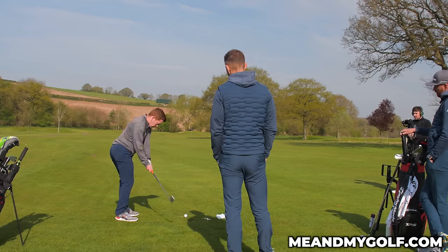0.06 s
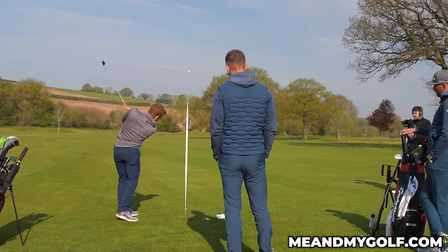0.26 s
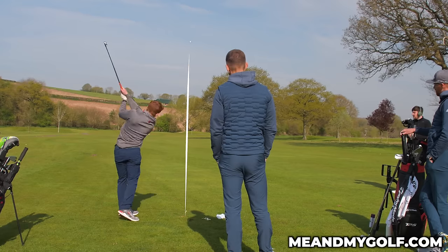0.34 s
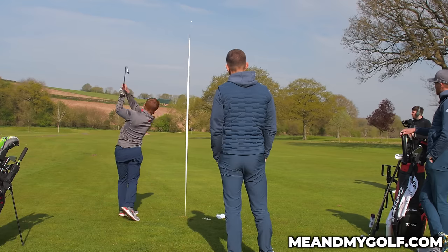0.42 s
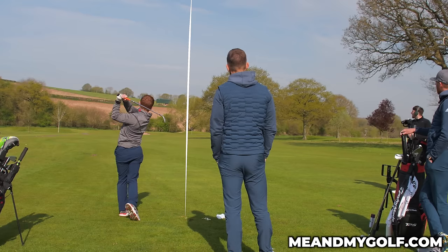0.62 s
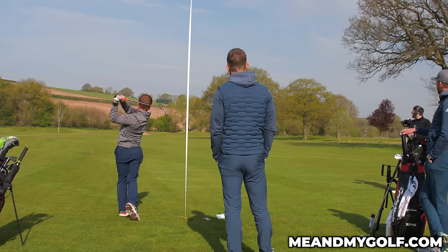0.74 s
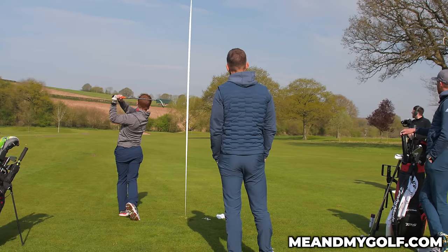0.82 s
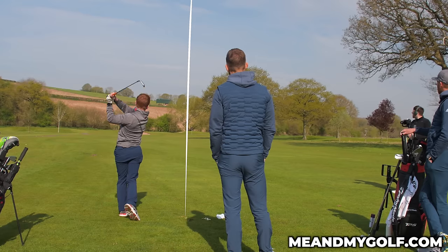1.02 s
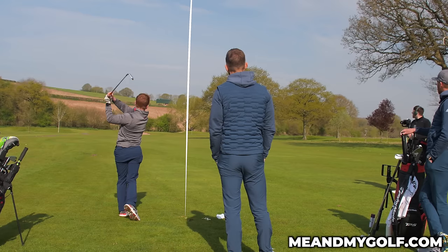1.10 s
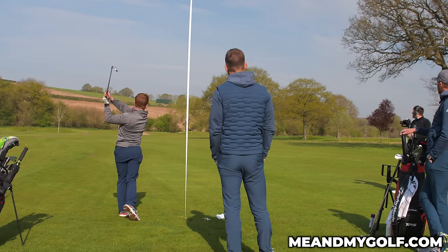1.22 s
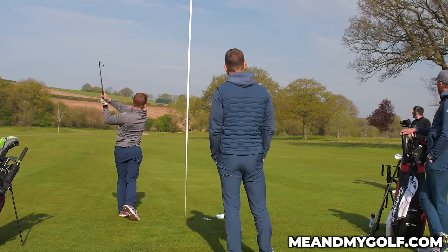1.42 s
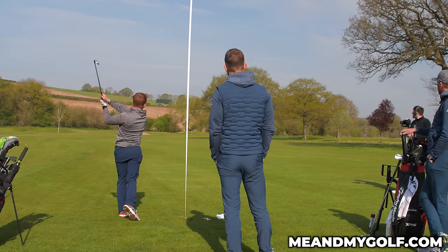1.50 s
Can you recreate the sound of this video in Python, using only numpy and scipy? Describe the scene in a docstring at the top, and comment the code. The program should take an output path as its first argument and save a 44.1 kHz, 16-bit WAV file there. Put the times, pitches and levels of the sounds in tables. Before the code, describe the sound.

An iron hits a golf ball with one sharp click and a brief cut of turf, just after a faint swish. Soil patters down and clothes rustle softly, while light wind rumbles on a nearby microphone on an open course.

```python
"""An iron strikes a golf ball on an open course, heard on one microphone close to the player.
The face cracks against the ball and rings briefly, and the blade cuts the turf. Just before, the shaft
sheds vortices and whistles up to speed. Soil patters down, small ticks and soft bumps follow, clothes
rustle through the follow-through, and moving air rumbles on the microphone."""
import sys
import numpy as np
from scipy.fft import rfft, irfft, next_fast_len
from scipy.io import wavfile
from scipy.ndimage import map_coordinates

SR = 44100
rng = np.random.default_rng(int(sys.argv[2]) if len(sys.argv) > 2 else 0)


def to_wav(sig):
    """Store sig (one row per channel, or 1-D mono) as 16-bit WAV at the path in sys.argv[1].

    Samples outside -1..1 are clipped; the rate is SR.
    """
    pcm = np.clip(np.atleast_2d(sig), -1, 1) * 32767
    pcm = np.round(pcm).astype(np.int16)
    wavfile.write(sys.argv[1], SR, pcm.T)  # frames by channels


N = 68355

# The dry snap of ticks and falling soil. Each row: frequency in Hz, gain in dB.
SNAP_COLOUR = [(200, -3), (700, 1), (2400, -1.5), (5000, 0), (7000, -3.5), (11000, -1.5), (13500, -8.5),
               (16000, -37)]
# The bright hiss of fabric and air. Each row: frequency in Hz, gain in dB.
HISS_COLOUR = [(500, -21.5), (2000, 2), (4000, 1.5), (7000, 0), (10000, 1.5), (13000, 2.5), (14200, -8.5),
               (15500, -28)]


def strike(ring_start_s=.2466, ping_hz=4202, ping_t60=.0105, ping_attack_s=.000398):
    """The clicks of the strike, then two quick echoes; each feeds the bright ping of ball and face."""
    # The last two are the fainter echoes. Each row: start in seconds, click and ping levels in dB.
    clicks = [(0.2464, -5.5, -31.5), (.24728, -1.5, -21.5), (0.2493, -4, -12), (0.2501, -5, -9.5),
              (0.2548, -10.5, -18.5), (.25864, -17, -22.5)]
    # The colour of a click. Each row: frequency in Hz, gain in dB.
    click_colour = [(60, -13.5), (300, 1), (650, 4.5), (1000, -4), (1600, 3), (2400, -4), (3400, 1),
                    (4500, -3), (5250, -15), (6100, -5), (9000, -10), (11500, -8), (14000, -18),
                    (16000, -28)]
    # Faint, short tones that colour the hit and ring on just after it.
    # Each row: frequency in Hz, level in dB, t60 in seconds.
    strike_tones = [(323, -26.5, 0.065), (465, -31.5, .06), (852, -34.5, .05), (1062, -33.5, .05),
                    (1280, -30, .05), (1641, -30.5, .045), (1934, -24, .05), (2317, -35, 0.052),
                    (2613, -33.5, .045), (2868, -25.5, 0.05), (3539, -24.5, 0.045), (4010, -29, .035),
                    (5685, -38.5, 0.063), (6100, -35.5, .045), (11870, -37, .04)]
    pulses, ping_envelope = np.zeros(N), np.zeros(N)
    for start, click_db, ping_db in clicks:
        pulses[round(start * SR)] += amp(click_db)
        t = since(start)
        ping_envelope += amp(ping_db) * rise(t, ping_attack_s) * fade(t, ping_t60)
    t = since(ring_start_s)
    ping = ping_envelope * np.sin(2 * np.pi * ping_hz * t)
    tones = sum(amp(db) * ring(t, hz, t60, attack=.0018) for hz, db, t60 in strike_tones)
    return causal_filter(pulses, click_colour) + ping + tones


def turf():
    """The blade brushes the grass, then tears the turf in short bursts over one low ground thump."""
    # The bursts. Each row: start in seconds, level in dB, then attack, hold and t60 in seconds.
    cuts = [(0.2413, -44, .002, .003, .01), (0.2459, -18, 0.0013, .003, .03),
            (0.257, -29, .001, .004, .032), (0.277, -49.5, .002, .003, 0.062)]
    # The colour of tearing turf. Each row: frequency in Hz, gain in dB.
    turf_colour = [(60, -8.5), (300, 2), (700, 6.5), (1500, 0), (2600, -0.5), (4000, 4.5), (5250, -15),
                   (6100, -7), (9000, -11), (11500, -8), (14000, -16), (16000, -30.5)]
    tearing = np.zeros(N)
    for start, db, attack, hold, t60 in cuts:
        onset = np.minimum(since(start) / attack, 1)
        tearing += amp(db) * onset * fade(since(start + hold), t60)
    thump = amp(-23.5) * ring(since(.2492), hz=62, t60=.067, attack=.0008)
    return tearing * noise(turf_colour) + thump


def swish(pitch_waver=.03, rush_peak_s=.21, rush_db=-49.5, rise_s=.027, fall_s=.055):
    """Vortices shed by the shaft whistle at a pitch that follows its speed, in a rush of air."""
    # The whistle along the swing. Each row: time in seconds, pitch in Hz, level in dB.
    swing = [(.11, 301.7, -91), (.155, 372.7, -81), (.178, 400.4, -46), (.19, 451.5, -54),
             (.205, 503.7, -38.5), (.218, 522.6, -50.5), (.238, 554.6, -33), (.246, 535, -43.5),
             (.285, 416, -50.5), (.305, 382, -63.5)]
    # The colour of the rush. Each row: frequency in Hz, gain in dB.
    rush_colour = [(100, -15), (350, 2), (800, 5), (1400, -12), (2800, -7.5), (5000, -23.5), (12000, -25),
                   (16000, -34.5)]
    hz, db = curves(swing)
    phase = 2 * np.pi * np.cumsum(hz * (1 + pitch_waver * wobble(110))) / SR
    release = fade(since(swing[-1][0]), t60=.12)
    whistle = unit(np.sin(phase)) * amp(db + 1.2 * wobble(110)) * release
    t = clock() - rush_peak_s
    swell = np.exp(-.5 * (t / np.where(t < 0, rise_s, fall_s)) ** 2)
    return whistle + amp(rush_db) * swell * noise(rush_colour)


def ticks(knock_t60=.004, snap_t60=.0033, attack_s=.00017):
    """Small dry ticks, as of grit and clothing: each a dead knock of two modes with a snap of noise."""
    # Each row: start in seconds, low mode in Hz and dB, high mode in Hz and dB, snap level in dB.
    knocks = [(0.0192, 3680, -57, 10750, -38.5, -52.5), (0.301, 4140, -41, 6200, -44, -50),
              (0.3261, 2530, -33, 4800, -32, -39.5), (0.3485, 2880, -41, 4400, -47, -49),
              (.357, 1910, -45, 12500, -46, -42.5), (0.4015, 2550, -32, 4250, -35.5, -42.5),
              (0.4806, 2680, -28.5, 4900, -34.5, -39), (0.6816, 1500, -47, 6500, -50, -43),
              (.868, 904, -48, 3530, -53, -53.5), (1.222, 1900, -60, 4030, -61, -57),
              (1.435, 4484, -66, 6500, -60, -64), (1.461, 5000, -58, 11000, -54, -56)]
    snap, out = noise(SNAP_COLOUR), np.zeros(N)
    for start, low_hz, low_db, high_hz, high_db, snap_db in knocks:
        t = since(start)
        out += amp(low_db) * ring(t, low_hz, knock_t60, attack_s)
        out -= amp(high_db) * ring(t, high_hz, knock_t60, attack_s)
        out += amp(snap_db) * snap * rise(t, attack_s) * fade(t, snap_t60)
    return out


def grit(count=24, centre_s=.385, spread_s=.076, level_db=-40, scatter_db=3.5):
    """Crumbs of soil patter on the grass just after the strike."""
    crumbs = np.zeros(N)
    for when, size in rng.uniform(-1, 1, (count, 2)):
        landing_s = centre_s + when * spread_s
        crumbs[round(landing_s * SR)] += amp(level_db + scatter_db * size)
    return causal_filter(crumbs, SNAP_COLOUR)


def bumps():
    """Soft, heavily damped bumps as the player's body turns."""
    # Each row: start in seconds, level in dB, frequency in Hz, t60 in seconds.
    thuds = [(.3075, -35, 785, 0.017), (.378, -35.5, 260.6, 0.015), (0.4811, -27, 330, 0.013),
             (.47, -40, 90, 0.11), (.6, -34.5, 122.6, 0.14), (0.668, -36.5, 60, 0.13),
             (1.114, -38.5, 62, 0.1), (1.222, -38.5, 84.9, 0.074), (1.272, -41.5, 42, .16)]
    return sum(amp(db) * ring(since(start), hz, t60, attack=.0008) for start, db, hz, t60 in thuds)


def clothes():
    """Fabric close to the microphone flaps, rubs and hisses, with a fine uneven grain."""
    # The fabric's movement. Each row: time in seconds, then flap, rub and hiss levels in dB.
    movement = [(0, -73, -69.5, -80.5), (.07, -81, -76.5, -77.5), (.14, -62.5, -70, -74),
                (.29, -58.5, -59, -67.5), (.42, -58.5, -63.5, -66.5), (.56, -58, -57.5, -60),
                (.66, -49, -66, -69), (.815, -65.5, -71.5, -74.5), (.855, -57, -63, -74.5),
                (.9, -61, -65, -73.5), (.94, -58.5, -59.5, -71.5), (1.02, -51, -71.5, -75.5),
                (1.13, -72, -71, -75.5), (1.23, -67, -74.5, -77), (1.36, -77.5, -75.5, -80),
                (1.55, -78, -75, -77.5)]
    # The colour of flapping. Each row: frequency in Hz, gain in dB.
    flap_colour = [(40, -21), (120, 1.5), (200, -0.5), (330, -7.5), (500, -18.5), (1000, -36),
                   (3000, -60.5)]
    # The colour of rubbing. Each row: frequency in Hz, gain in dB.
    rub_colour = [(100, -14.5), (250, -2.5), (500, -1.5), (900, -4.5), (1800, -13.5), (3500, -23),
                  (8000, -44.5)]
    flap_db, rub_db, hiss_db = curves(movement)
    flap = amp(flap_db) * noise(flap_colour)
    rub = amp(rub_db + 1.1 * wobble(45)) * noise(rub_colour)
    hiss = amp(hiss_db + 1.3 * wobble(390)) * noise(HISS_COLOUR)
    return flap + rub + hiss


def air(hush_db=-87):
    """Moving air rumbles on the microphone over a faint steady hush."""
    # The swells of the rumble. Each row: time in seconds, level in dB.
    swells = [(0, -53.5), (.09, -60), (.2, -51.5), (.3, -49.5), (.43, -54.5), (.48, -49.5), (.54, -57),
              (.64, -46.5), (.72, -44.5), (.79, -53), (1.07, -50.5), (1.3, -53.5), (1.42, -58.5),
              (1.55, -62)]
    # The colour of the rumble. Each row: frequency in Hz, gain in dB.
    rumble_colour = [(12, -19.5), (22, -0.5), (45, 2), (80, 1.5), (130, -5), (230, -20), (500, -36.5),
                     (1100, -70), (3000, -110)]
    rumble_db, = curves(swells)
    return amp(rumble_db) * noise(rumble_colour) + amp(hush_db) * noise(HISS_COLOUR)


def amp(db):
    """Decibels to gain."""
    return 10 ** (np.asarray(db) / 20)


def unit(x):
    """Scaled to rms 1."""
    return x / np.sqrt(np.mean(x ** 2) + 1e-20)


def clock():
    """The time of each sample in seconds."""
    return np.arange(N) / SR


def since(start):
    """Seconds since start, zero before it."""
    return np.maximum(clock() - start, 0)


def curves(rows):
    """One value per sample for each column after the time."""
    times, *columns = np.transpose(rows)
    return [np.interp(clock(), times, column) for column in columns]


def wobble(rate):
    """A smooth random curve, rate knots a second."""
    return map_coordinates(rng.standard_normal(N), [clock() * rate + 2])


def gains(colour):
    """Gain of (Hz, dB) points on the FFT grid."""
    hz, db = np.transpose(colour)
    grid_hz = np.fft.rfftfreq(2 * next_fast_len(N), 1 / SR)
    return amp(np.interp(np.log(grid_hz + 1), np.log(hz + 1), db))


def noise(colour):
    """Coloured noise of rms 1."""
    white = rng.standard_normal(2 * next_fast_len(N))
    return unit(irfft(rfft(white) * gains(colour))[:N])


def causal_filter(x, colour):
    """x through a minimum-phase filter, so nothing sounds ahead of a pulse."""
    cepstrum = irfft(np.log(gains(colour)))
    size = len(cepstrum)
    cepstrum[1:size // 2] *= 2
    cepstrum[size // 2 + 1:] = 0
    return irfft(rfft(x, size) * np.exp(rfft(cepstrum)))[:N]


def rise(t, attack):
    """An onset from 0 to 1 with a time constant of attack seconds."""
    return 1 - np.exp(-t / attack)


def fade(t, t60):
    """A decay of 60 dB in t60 seconds."""
    return np.exp(-np.minimum(np.log(1000) * t / t60, 40))


def ring(t, hz, t60, attack):
    """One damped tone."""
    return np.sin(2 * np.pi * hz * t) * fade(t, t60) * rise(t, attack)


def scene():
    """The whole shot from close to the player, in mono."""
    return (swish() + strike() + turf() + ticks() + grit() + bumps() + clothes() + air())[None]


def record(dry, top_hz=15400):
    """The microphone rolls off the highest treble and cuts it away around top_hz."""
    # The microphone's response. Each row: frequency in Hz, gain in dB.
    mic_response = [(20, 0), (13000, 0), (14200, -2), (15000, -9), (16000, -16)]
    size = 2 * next_fast_len(N)
    hz = np.fft.rfftfreq(size, 1 / SR)
    band_limit = np.clip((top_hz - hz) / 500 + .5, 0, 1)
    return irfft(rfft(dry, size) * gains(mic_response) * band_limit, size)[:, :N]


dry = scene()
out = record(dry)
to_wav(out)
```